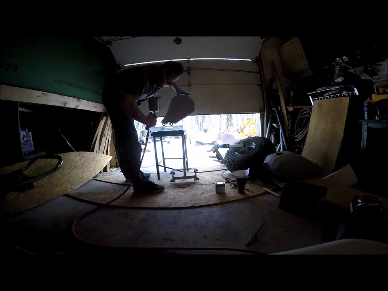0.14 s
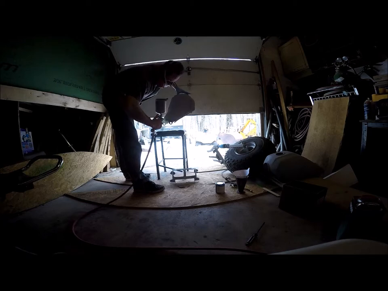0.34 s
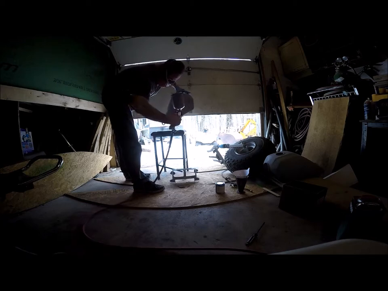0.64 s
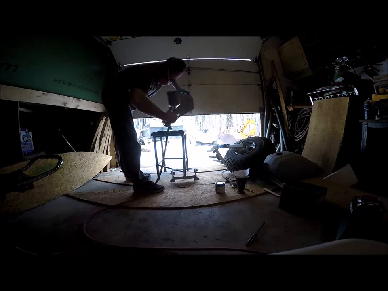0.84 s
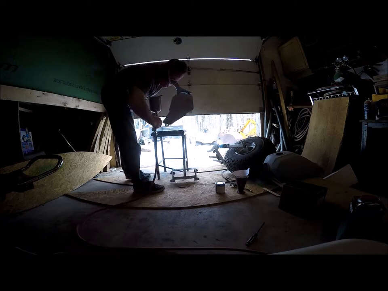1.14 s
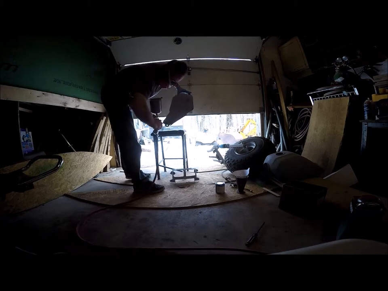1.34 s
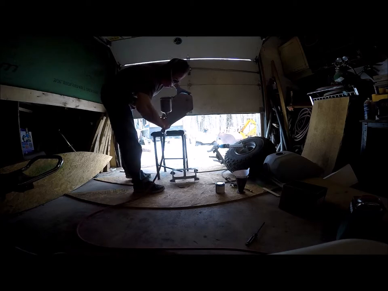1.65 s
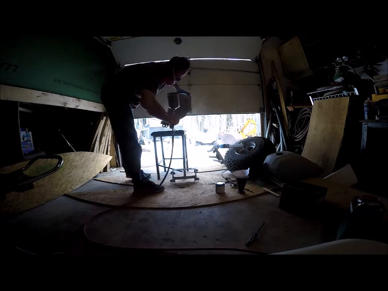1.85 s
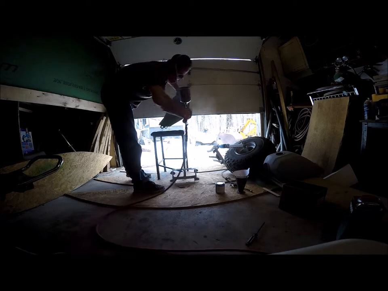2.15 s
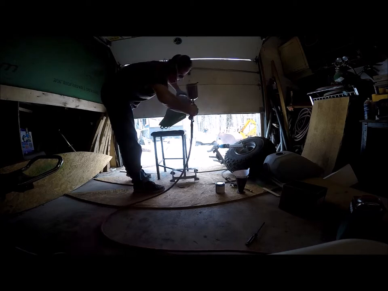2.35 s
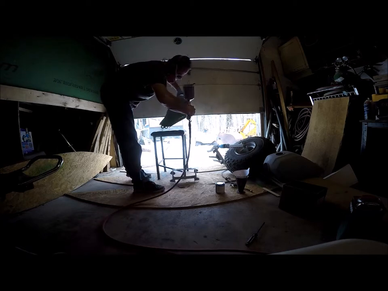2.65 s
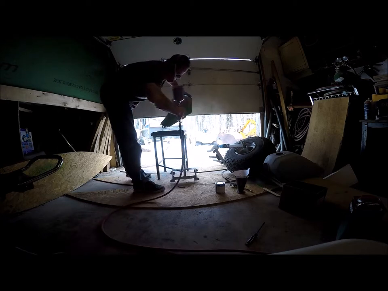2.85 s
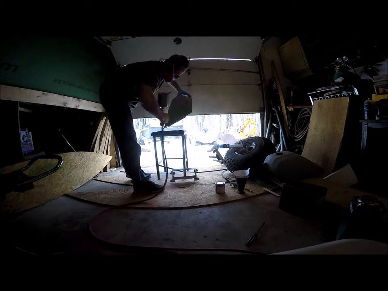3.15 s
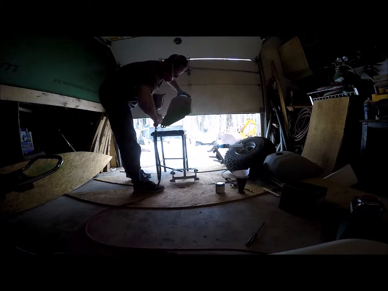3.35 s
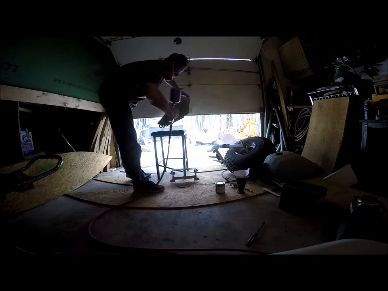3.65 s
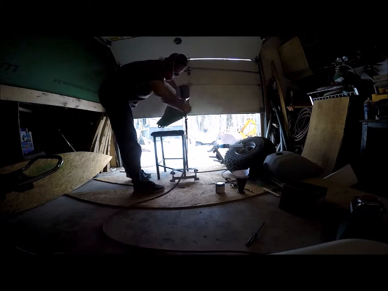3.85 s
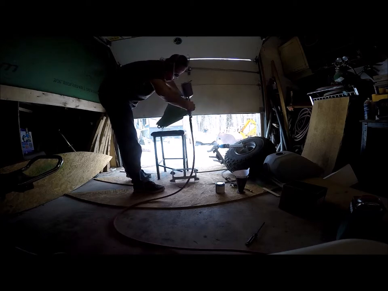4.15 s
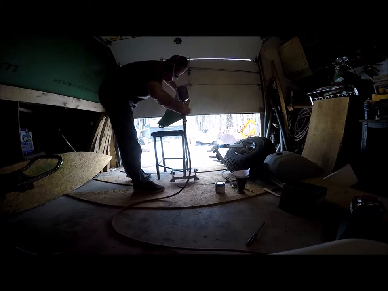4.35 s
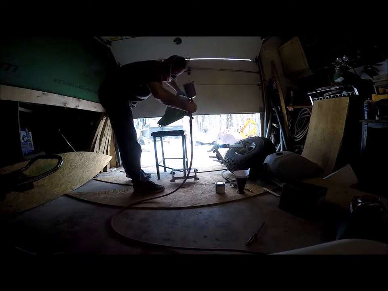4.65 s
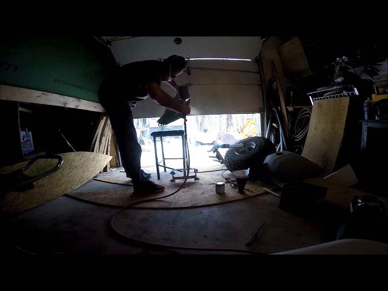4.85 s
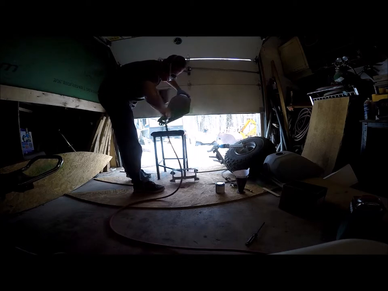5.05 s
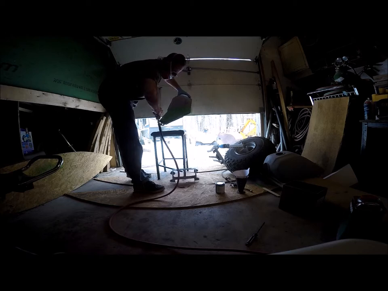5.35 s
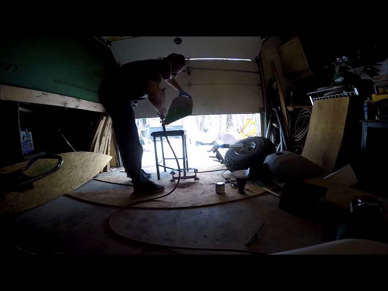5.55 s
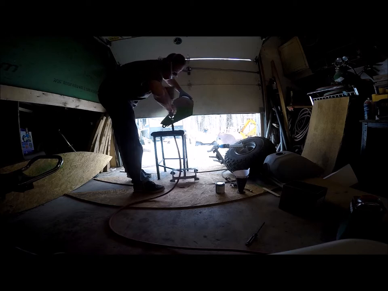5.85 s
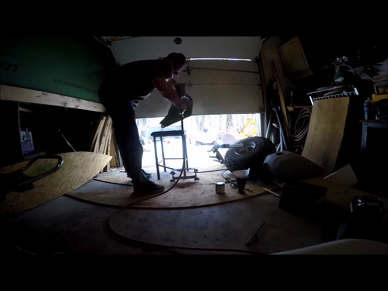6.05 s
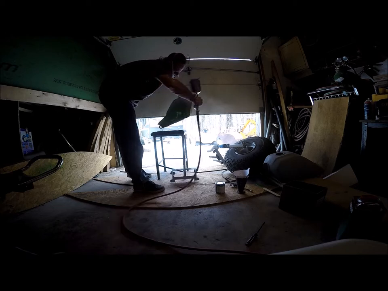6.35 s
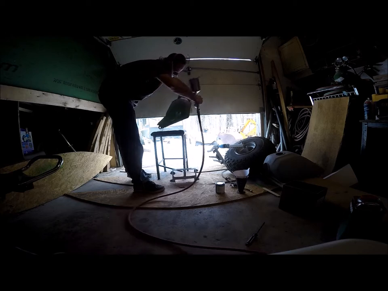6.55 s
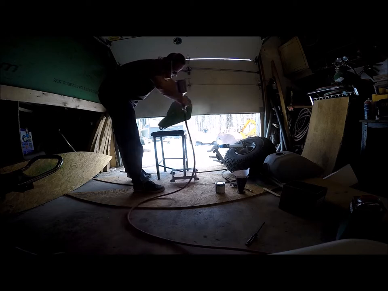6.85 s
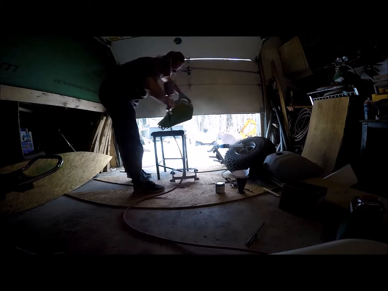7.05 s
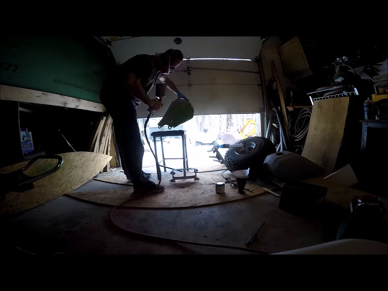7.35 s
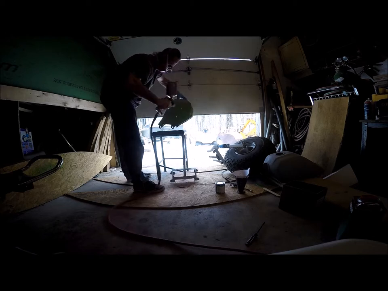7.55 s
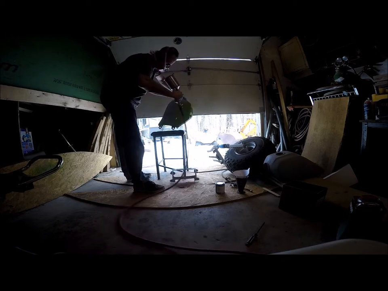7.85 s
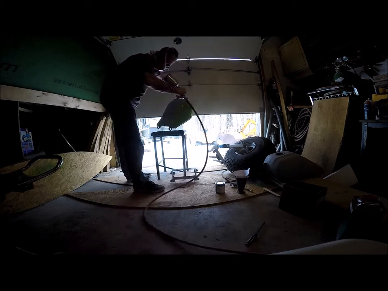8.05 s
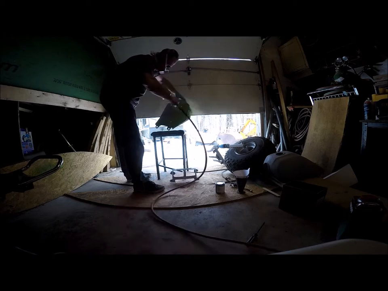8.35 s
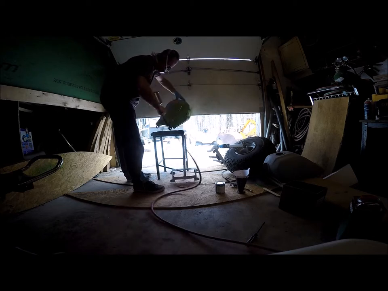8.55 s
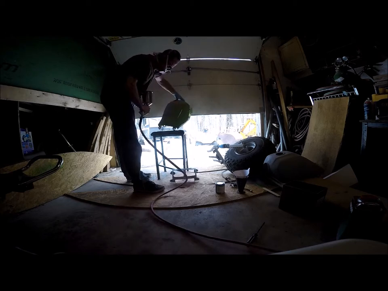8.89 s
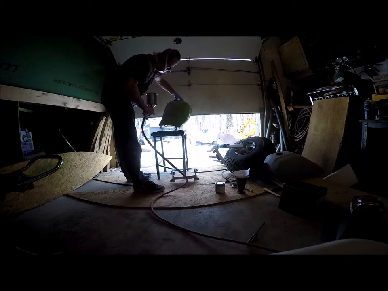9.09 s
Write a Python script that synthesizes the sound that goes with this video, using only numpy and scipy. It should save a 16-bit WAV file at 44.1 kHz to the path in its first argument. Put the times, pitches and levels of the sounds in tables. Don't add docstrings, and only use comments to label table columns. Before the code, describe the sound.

Paint spraying heard from near the floor of a garage: crisp pressurised hiss comes and goes in passes of about a quarter to three quarters of a second. Trigger pulls thump softly, one with a clear knock around 2.6 seconds. The air stirs a hollow tank and lightly booms a flat panel. Soles scuff and slide on grit between passes, above a low rumbling wash from the open door.

```python
import sys
import numpy as np
from scipy import signal
from scipy.io import wavfile
from scipy.ndimage import uniform_filter1d

SR = 44100
rng = np.random.default_rng(int(sys.argv[2]) if len(sys.argv) > 2 else 0)


def ratio(d):
    e = np.asarray(d, float) / 20
    return 10 ** e


def wav_record(signal):
    frames = np.transpose(np.atleast_2d(signal))
    bounded = np.clip(frames, -1, 1)
    quanta = np.round(bounded * 32767).astype(np.int16)
    wavfile.write(sys.argv[1], SR, quanta)


N = 406602
T = np.arange(N) / SR


def evened(x):
    return x / np.sqrt(np.mean(x ** 2) + 1e-20)


def read(points, hz):
    f, value = np.transpose(points)
    return np.interp(np.log(hz + 1), np.log(f + 1), value)


def noise(spectrum, patchy_db):
    frames = N // 256 + 5
    hz = np.fft.rfftfreq(1024, 1 / SR)
    real, imag, patches = rng.standard_normal((frames, 513, 3)).T
    patches = uniform_filter1d(patches, size=7, axis=0)
    patches = evened(uniform_filter1d(patches, size=14, axis=1))
    level_db = read(spectrum, hz)[:, None] + patchy_db * patches
    z = (real + 1j * imag) * ratio(level_db)
    return evened(signal.istft(z, nperseg=1024, noverlap=768)[1][:N])


def resonance(hz, width):
    pole = np.exp(-np.pi * width / SR)
    slow = signal.lfilter([1], np.poly([pole, pole]), rng.standard_normal((N, 2)) @ [1, 1j])
    return evened((slow * np.exp(2j * np.pi * hz * T)).real)


def waver(seconds):
    return evened(uniform_filter1d(rng.standard_normal(N), size=round(seconds * SR)))


def swells(rows):
    power = sum(ratio(2 * db) * np.exp(-((T - centre) / half_width) ** 2)
                for centre, half_width, db in rows)
    return np.sqrt(power)


# frequency in Hz, level in dB per Hz.
WASH = [(12, -50), (20, 0.5), (64, -4.5), (87, -24), (125, -6), (145, -20), (203, -3), (245, -26.5),
        (259, -15), (439, -6), (600, -30), (780, -50), (1320, -120)]
# frequency in Hz, level in dB per Hz.
FAR_HISS = [(400, -25), (600, 0), (1300, -4), (2000, -2), (3200, -3), (4600, -2), (6300, -5), (7600, -11),
            (13000, -15), (15400, -17)]
# frequency in Hz, width in Hz, level in dB.
DRONE = [(57, 12, -58), (120, 10, -64), (410, 150, -68)]


def still_air():
    drone = sum(ratio(db) * resonance(hz, width) for hz, width, db in DRONE)
    hiss = ratio(-63) * noise(FAR_HISS, patchy_db=1.5)
    swell_db = 2.0 * waver(seconds=0.15)
    wash = ratio(-57.5 + swell_db) * noise(WASH, patchy_db=2.0)
    return wash + hiss + drone


# opens in seconds, shuts in seconds, jet level in dB, opening surge in dB.
PASSES = [
    (0.28, 0.696, -35, 4),
    (1.491, 2.303, -34.5, 3.5),
    (2.638, 3.286, -34, 4.5),
    (3.495, 4.011, -34, 4),
    (4.823, 5.165, -34.5, 4.5),
    (5.657, 6.343, -34, 2.5),
    (6.692, 7.181, -33.5, 3.5),
    (8.146, 8.683, -34.5, 4.5),
    (9.141, 9.4, -36, 4),
]


def flow():
    open_s, surge_s, drain_db_per_s = 0.015, 0.02, 397
    gain, surge_db = np.zeros(N), np.zeros(N)
    for opens, shuts, db, top_db in PASSES:
        since = np.maximum(T - opens, 0)
        over_db = top_db * since / surge_s * np.exp(1 - since / surge_s)
        drain_db = drain_db_per_s * np.maximum(T - shuts, 0)
        opening = 1 - np.exp(-(since / open_s) ** 2)
        gain += opening * ratio(db + over_db - drain_db)
        surge_db += over_db
    return gain, surge_db


# frequency in Hz, level in dB per Hz.
JET = [(290, -15.5), (500, -13), (586, -28.5), (716, -18.5), (1010, -15), (1170, -22.5), (1390, -15),
       (1850, -12), (2360, -7), (4640, -2.5), (5430, 1), (8850, -12), (13200, -11), (14800, -7),
       (15450, -14), (15700, -42)]
# frequency in Hz, level in dB per Hz.
FIZZ = [(4410, -16.5), (7500, 7), (8840, 2.5), (9680, 7.5), (13400, 5.5), (14700, 2.5), (15500, -4.5)]
# frequency in Hz, width in Hz.
CAP_RING = (5900, 1600)


def jet(gain, surge_db):
    waver_db = 0.25 * waver(seconds=0.05)
    body = ratio(3.5) * noise(JET, patchy_db=1.5)
    fizz = ratio(-7 + 2 * surge_db) * noise(FIZZ, patchy_db=1.2)
    cap = ratio(5) * (ratio(surge_db) - 1) * resonance(*CAP_RING)
    return gain * ratio(waver_db) * (body + fizz + cap)


def ring(modes):
    t = T[:12000]
    sound = sum(ratio(db - 60 * t / t60) * np.sin(2 * np.pi * hz * t) for hz, db, t60 in modes)
    sound = sound * (1 - np.exp(-t / 0.0051))
    return sound / abs(sound).max()


# time in seconds, low thump in dB, knock in dB.
VALVE_MOVES = [(0.285, -41, -46), (0.692, -41, -42), (1.501, -40, -54), (2.293, -42, -44),
               (2.645, -37, -27), (3.296, -44.5, -49), (3.506, -38.5, -61), (4.01, -44, -55),
               (4.834, -40, -60), (5.179, -44, -55), (5.667, -41, -61), (6.34, -42, -56), (6.7, -39.5, -61),
               (7.184, -43, -55), (8.156, -41, -54), (8.686, -41, -48), (9.15, -44, -47)]
# frequency in Hz, level in dB, t60 in seconds.
THUMP = [(29.4, 0, 0.39), (58.7, 11.5, 0.094), (127, -10, 0.064)]
# frequency in Hz, level in dB, t60 in seconds.
KNOCK = [(205, 7.5, 0.069), (318, 7.5, 0.23), (488, 25, 0.015)]


def valve():
    thump, knock = ring(THUMP), ring(KNOCK)
    out = np.zeros(N + 13000)
    for s, thump_db, knock_db in VALVE_MOVES:
        early = round((s - 0.005) * SR)
        late = round((s + 0.00356) * SR)
        out[early:early + 12000] -= ratio(thump_db + 5.5) * thump
        out[late:late + 12000] += ratio(knock_db + 0.5) * knock
    return out[:N]


# frequency in Hz, width in Hz, level in dB.
TANK = [(221, 84, -4), (317, 37, -2.5), (389, 57, -2), (460, 50, -6), (603.6, 290, -10.5),
        (1038, 410, -9.5)]
# frequency in Hz, width in Hz.
PANEL = (100, 59)
# centre in seconds, half width in seconds, level in dB.
ON_TANK = [(.33, 0.022, -38), (.5, 0.085, -36), (1.7, 0.063, -41), (1.88, 0.096, -39.5),
           (2.1, 0.052, -40.5), (2.22, 0.043, -43), (2.7, 0.029, -33.5), (2.86, 0.077, -45.5),
           (3.9, 0.11, -44.5), (4.97, 0.056, -47), (5.09, 0.067, -48.5), (6.29, 0.11, -49),
           (6.82, 0.084, -54), (7.19, 0.08, -56), (8.66, 0.035, -42.5), (9.21, 0.046, -46)]
# centre in seconds, half width in seconds, level in dB.
ON_PANEL = [(.31, 0.015, -42), (1.51, 0.023, -45.5), (1.85, .06, -50), (2.12, 0.052, -51),
            (2.65, 0.015, -53), (3.285, 0.015, -44.5), (3.51, 0.016, -55), (4.0, .03, -46),
            (6.08, .06, -55), (6.7, .02, -55), (7.0, .08, -50), (7.1, 0.024, -48), (7.19, 0.018, -43.5),
            (8.36, 0.043, -45), (8.55, .07, -51), (8.7, .02, -46), (9.16, 0.016, -47)]


def target(gain):
    tank = evened(sum(ratio(db) * resonance(hz, width) for hz, width, db in TANK))
    on_tank = np.hypot(swells(ON_TANK), ratio(-23) * gain)
    on_panel = np.hypot(swells(ON_PANEL), ratio(-22.5) * gain)
    return on_tank * tank + on_panel * resonance(*PANEL)


def strokes(rows, column):
    gain = np.zeros(N)
    for row in rows:
        start, fade = row[0], row[1]
        rise = 1 - np.exp(-np.maximum(T - start, 0) / 0.0037)
        gain += ratio(row[column]) * rise * np.exp(-abs(T - start) / fade)
    return gain


# start in seconds, fade in seconds, sole level in dB, treble grit level in dB.
SCUFFS = [
    (5.4, 0.025, -66, -74),
    (6.5, .08, -57, -68),
    (2.405, 0.022, -46, -48),
    (3.398, 0.022, -49.5, -47),
    (7.25, 0.084, -51, -68),
    (7.395, 0.042, -50, -59),
    (7.92, 0.047, -68, -63),
    (8.03, 0.11, -53, -58),
]
# frequency in Hz, level in dB per Hz.
SOLE = [(150, -46), (260, -15.5), (416, -13), (590, -16), (1050, -17), (1220, -42), (1320, -18),
        (3000, -31), (3900, -21), (6600, -120)]
# frequency in Hz, level in dB per Hz.
GRIT = [(1180, -14), (2000, -9), (2360, 1.5), (3330, -8), (6200, -4), (7430, -19), (12000, -14),
        (15600, -48), (22000, -120)]
# centre in seconds, half width in seconds, level in dB.
DRAG = [
    (1.47, .025, -59),
    (4.545, .03, -58.5),
]
# frequency in Hz, level in dB per Hz.
HOSE = [(3000, -30), (4300, -9), (5200, -3), (6100, 0), (7000, -10), (9000, -35)]


def scuffs():
    grain = ratio(2.0 * waver(seconds=300 / SR))
    sole = strokes(SCUFFS, column=2) * noise(SOLE, patchy_db=-1.5)
    grit = strokes(SCUFFS, column=3) * noise(GRIT, patchy_db=1.5)
    hose = swells(DRAG) * noise(HOSE, patchy_db=1.5)
    return (sole + grit + hose) * evened(grain)


# frequency in Hz, t60 in seconds.
DECAY = [(60, .4), (400, .5), (1200, .42), (1900, .45), (2100, 1.1), (2350, .48), (3300, .44), (4100, .55),
         (4800, .5), (5900, .72), (6800, .42), (9000, .3), (10300, .45), (11500, .28), (15000, .22)]


def tail():
    taps = np.zeros(SR // 2)
    at = np.arange(300, SR // 2 - 20, 20)
    taps[at + rng.integers(0, 20, len(at))] = rng.choice([-1., 1.], len(at))
    hz, t, z = signal.stft(taps, SR, nperseg=256)
    decay_db = -60 * t / read(DECAY, hz)[:, None]
    out = signal.istft(z * ratio(decay_db), SR, nperseg=256)[1]
    return out / np.linalg.norm(out)


def garage(x):
    out = np.zeros(N)
    for k in range(3):
        turn = np.sqrt(2 / 3) * np.cos(2 * np.pi * 1.3 * T + k * np.pi / 3)
        out += signal.fftconvolve(x * turn, tail())[:N]
    return out


def scene():
    gain, surge_db = flow()
    near = jet(gain, surge_db) + target(gain) + scuffs()
    heard = near + ratio(-10) * garage(near)
    mono = heard + valve() + still_air()
    return np.array([mono, mono])


# time in seconds, kept range in dB.
THINNED = [(.116, 7), (.714, 9), (.839, 8), (2.72, 4), (3.358, 9), (3.55, 8), (4.264, 2), (4.467, 8),
           (4.574, 10), (5.32, 9), (5.373, 3), (6.11, 5), (6.621, 5), (7.221, 6), (8.586, 7), (9.204, 5)]
# time in seconds, band centre in Hz.
WIDENED = [(1.99, 13800), (2.22, 5700), (2.22, 9000), (2.405, 5000), (2.85, 5800), (2.9, 13200),
           (2.9, 14500), (3.15, 4700), (3.15, 14500), (3.27, 6300), (5.8, 11000), (5.8, 13800),
           (5.915, 9000), (6.915, 9000), (8.425, 6100), (8.425, 14500), (8.605, 7000), (8.63, 8200)]


def camera(x):
    hz, t, z = signal.stft(x, SR, nperseg=1024, noverlap=768)
    side = np.zeros_like(z)
    spin = np.exp(2j * np.pi * rng.random(len(t)))
    for s, centre_hz in WIDENED:
        band = abs(hz - centre_hz) < 750
        bump = np.cos(np.clip((t - s) / 0.017, -1, 1) * np.pi / 2)
        side[band] += 4.0 * bump * abs(z[band]) * spin
    for s, kept_db in THINNED:
        near = abs(t - s) < 0.009
        size = abs(z[:, near]).mean(axis=1)
        threshold = np.sqrt(uniform_filter1d(size, size=40) * size[hz > 1500].max())
        weak = (size < ratio(-kept_db) * threshold) & (hz > 500)
        z[:, near] *= np.where(weak, 0.09, 1)[:, None]
    both = np.array([z + side, z - side]) * (hz < 15420)[:, None]
    return signal.istft(both, SR, nperseg=1024, noverlap=768)[1][:, :N]


def low_pass(x):
    return signal.sosfilt(signal.butter(12, 16600, fs=SR, output="sos"), x)


def record(dry):
    mix = camera(dry[0])
    return low_pass(mix)


dry = scene()
out = record(dry)
wav_record(out)
```